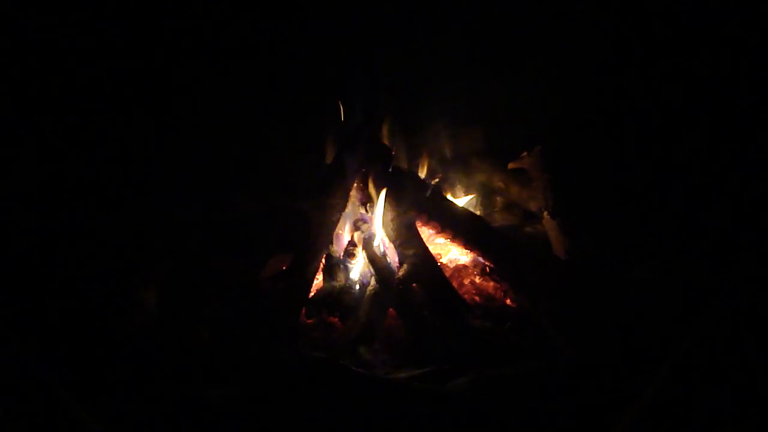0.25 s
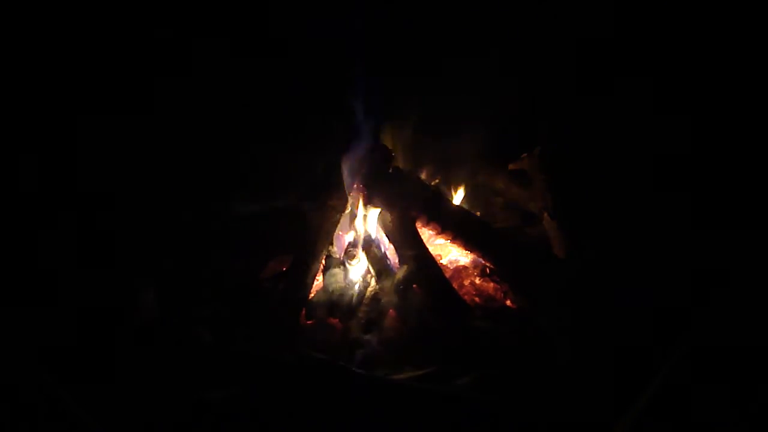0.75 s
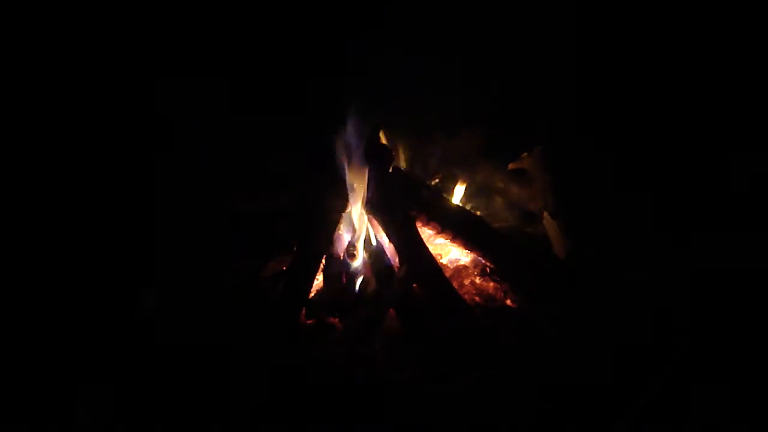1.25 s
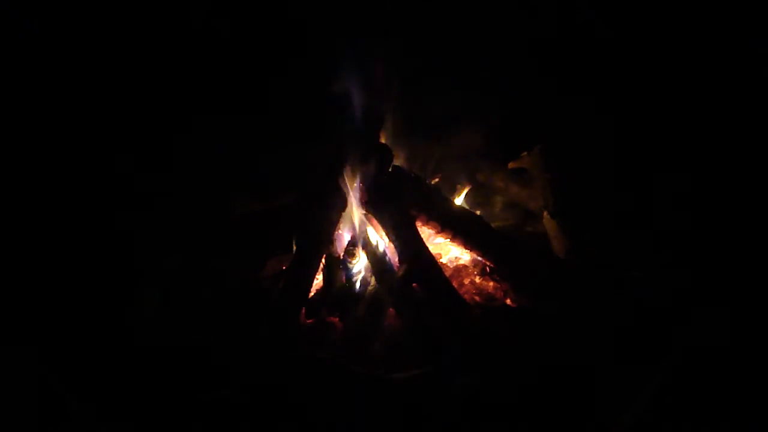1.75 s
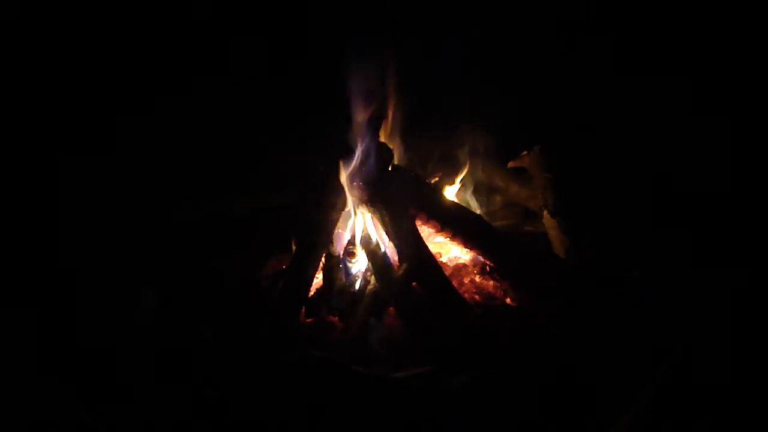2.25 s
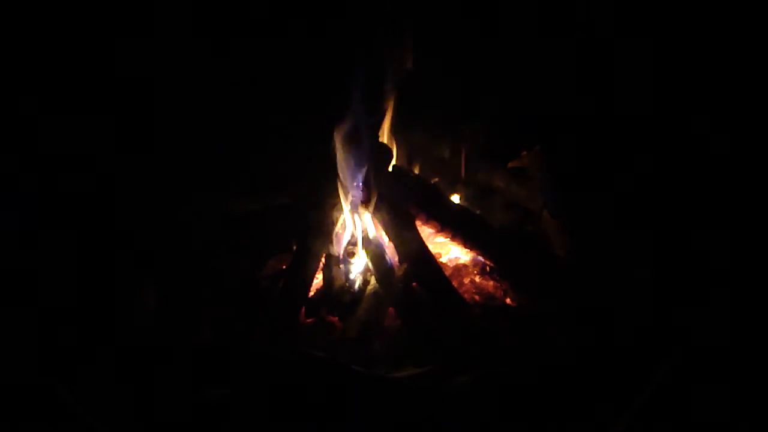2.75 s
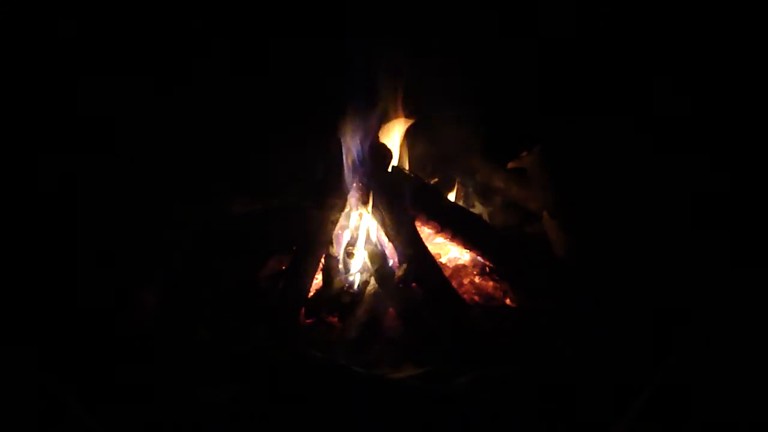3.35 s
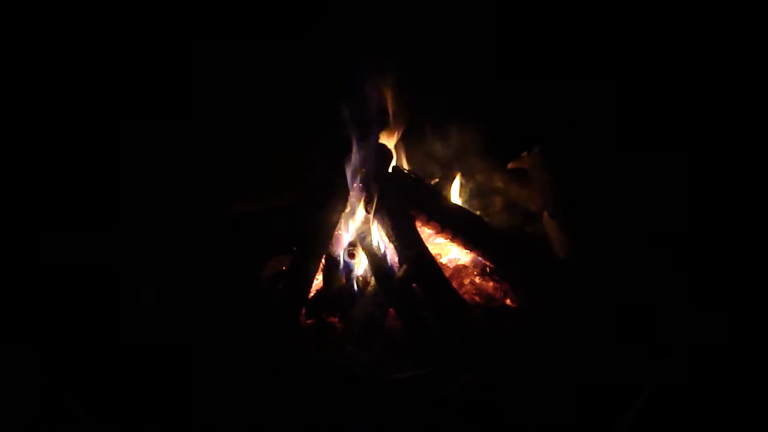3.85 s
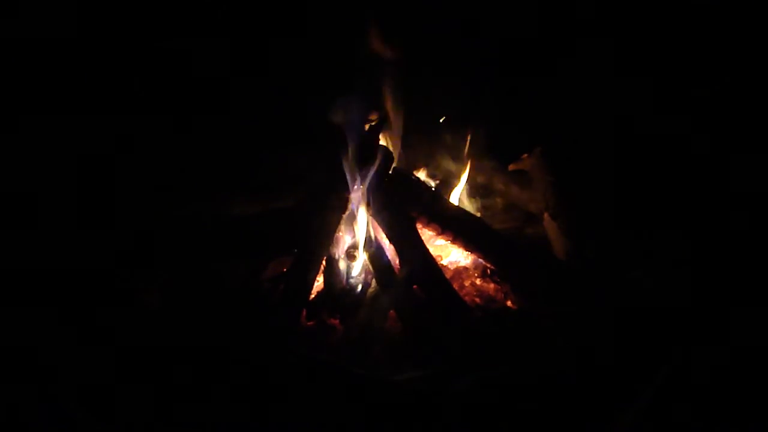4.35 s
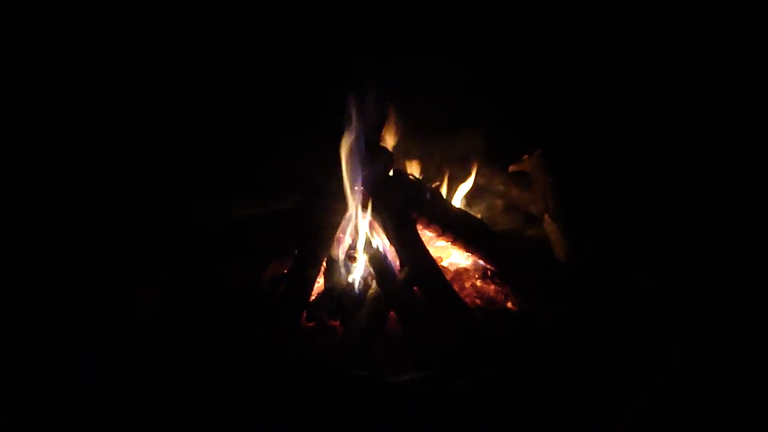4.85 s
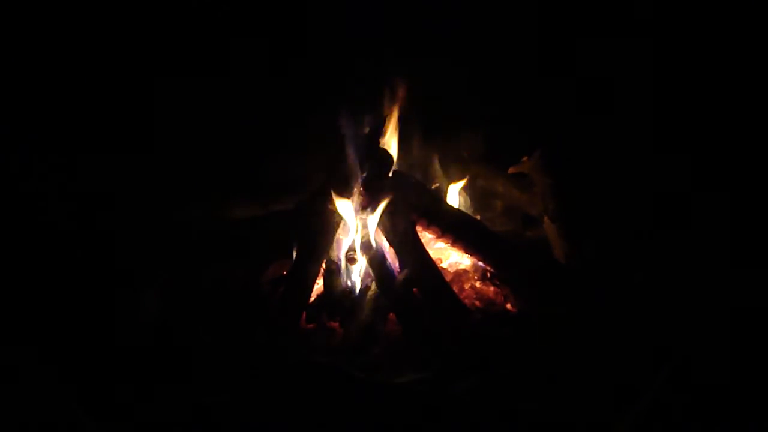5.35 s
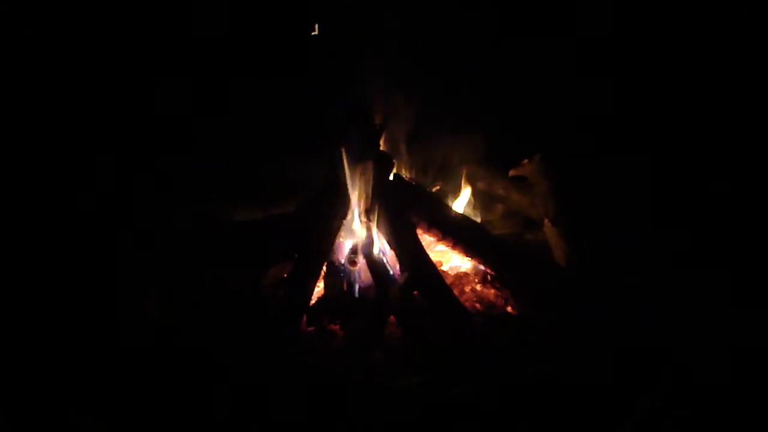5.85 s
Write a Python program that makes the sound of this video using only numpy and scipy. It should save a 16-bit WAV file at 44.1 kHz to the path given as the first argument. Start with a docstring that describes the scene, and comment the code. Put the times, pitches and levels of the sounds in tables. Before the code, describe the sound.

A small campfire burns close to the microphone, outdoors at night. Dry cracks and hollow, woody pops come at uneven moments, loudest in the first half, then lighter snaps follow, with one more strong pop near the end. Tiny ticks fill the gaps. Underneath are a soft, steady rush of flames, a thin sizzle and a faint drone like distant traffic.

```python
"""Outdoors at night, close to a small campfire.
Gas pockets in the logs burst as dry cracks and hollow knocks; each bounces off the wood and the ground,
and the surroundings answer faintly. Under them sit the soft rush of the flames, a thin sizzle of steam,
tiny ticks, a few low thuds and a far drone like road traffic."""
import sys
import numpy as np
from scipy.fft import rfft, irfft, next_fast_len
from scipy.io import wavfile
from scipy.ndimage import map_coordinates

SR = 44100
rng = np.random.default_rng(int(sys.argv[2]) if len(sys.argv) > 2 else 0)


def to_wav(s):
    """Save 16-bit WAV."""
    ch = np.atleast_2d(s).T  # columns
    pcm = np.round(np.clip(ch, -1, 1) * 32767)  # PCM
    wavfile.write(sys.argv[1], SR, pcm.astype(np.int16))


N = 268524

# Tone of the flames' rush in the night air: frequency_hz, gain_db
RUSH_EQ = [(15, -63), (25, -37), (81, -22), (145, -11.5), (280, -7.5), (335, -4), (490, -9), (999, -8.5),
           (1460, -14), (2250, -18), (2430, -17.5), (2830, -17.5), (5490, -24.5), (10100, -26),
           (10900, -27.5), (14200, -139), (22000, -120)]
# The four bands of a burst (thump, body, crack, snap): low_hz, high_hz
BURST_BANDS = [(150, 800), (800, 2000), (2000, 5500), (5500, 11000)]
# Tone of the hollow between the stacked logs: frequency_hz, gain_db
HOLLOW_EQ = [(30, -24), (130, -5.5), (290, 2), (420, -3.5), (660, 5.5), (950, 9), (1550, 8), (1880, 0),
             (2350, 0.5), (3050, 1), (3700, -5.5), (4500, 2), (5900, -5), (7400, 1.5), (8700, -1.5),
             (10300, 0)]
# Tone of the surroundings' answer: frequency_hz, gain_db
ECHO_EQ = [(100, -25), (700, -7), (1500, -4.5), (3000, -3.5), (6500, 5), (11000, -2)]
# Dry cracks: start_s, level_db, brightness_db_per_octave, pitch_hz, ground_delay_s
CRACK_CUES = [(0.175, 4, -1, 1150, 0.00091), (0.976, -7, 2, 800, 0.00072),
              (1.196, 2.5, -0.7, 4630, 0.00084), (2.1356, 1, 5, 4900, 0.0011),
              (2.1706, -17.5, -4, 5200, 0.00113), (2.2897, -18, -3.5, 2550, 0.00083),
              (2.488, -26, 4, 5500, 0.00081), (2.5954, -15.5, 1.5, 2780, 0.00118),
              (3.6125, -11, 4.5, 3220, 0.0011), (3.9053, -15, -3, 1300, 0.001),
              (3.9296, -7.1, 1, 1520, 0.00104), (4.0832, -12.7, 3, 3500, 0.0012),
              (4.3568, -5, 0.1, 1400, 0.00129), (4.615, -18, 3, 2700, 0.0011),
              (5.1342, -9.5, -0.1, 1100, 0.00073), (5.2253, -11.5, -0.2, 3270, 0.00072),
              (5.5851, -7.5, 1.5, 3400, 0.0014), (6.0635, -13, -3.5, 850, 0.0011)]
# Soft low thuds: peak_s, level_db
THUD_CUES = [(0.628, -41), (0.654, -45), (0.6864, -41), (2.137, -41), (2.172, -36)]
# Hollow knocks: start_s, level_db, brightness_db_per_octave, pitch_hz
KNOCK_CUES = [(0.6288, 11.5, 2, 2000), (0.7328, 4, 0.7, 2170), (2.7794, 10, -1, 2780),
              (3.005, -11.5, -6.5, 655), (5.6961, 7.5, -0.5, 1650)]

BAND_CENTRES_HZ = np.sqrt(np.prod(BURST_BANDS, axis=1))


def amp(db):
    return 10 ** (np.asarray(db) / 20)


def unit_rms(x):
    return x / np.sqrt(np.mean(x ** 2) + 1e-20)


def eq_db(points, hz):
    """An EQ curve through (frequency_hz, gain_db) points on a log frequency axis."""
    points_hz, gains_db = np.transpose(points)
    return np.interp(np.log(hz + 1), np.log(points_hz + 1), gains_db)


def wobble(rate_hz):
    """A smooth random drift."""
    knots = rng.standard_normal(int(N * rate_hz / SR) + 4)
    return map_coordinates(knots, [np.arange(N) * rate_hz / SR])


def filtered(x, response):
    """Shape a sound with a gain that depends on frequency."""
    size = next_fast_len(len(x) + SR // 10)
    return irfft(rfft(x, size) * response(np.fft.rfftfreq(size, 1 / SR)), size)[:len(x)]


def causal(gain):
    """The minimum-phase response with this gain: nothing sounds before the hit."""
    cepstrum = irfft(np.log(np.maximum(gain, 1e-6)))
    half = len(cepstrum) // 2
    cepstrum[1:half] *= 2
    cepstrum[half + 1:] = 0
    return np.exp(rfft(cepstrum))


def noise_band(centre_hz, width_hz):
    """Noise of rms 1 in one narrow resonance."""
    noise = rng.standard_normal(N)
    return unit_rms(filtered(noise, lambda hz: 1 / (1 + ((hz - centre_hz) / width_hz) ** 2)))


def add(track, start_s, sound):
    start = int(np.clip(round(start_s * SR), 0, N - 1))
    track[start:start + len(sound)] += sound[:N - start]


def flames(level_db=-52.5, flutter_db=0.66):
    """The bed: an even rush of fire in the night air, fluttering slightly."""
    rush = unit_rms(filtered(rng.standard_normal(N), lambda hz: amp(eq_db(RUSH_EQ, hz))))
    return rush * amp(level_db + flutter_db * wobble(rate_hz=9))


def sizzle(pitch_hz=2440, width_hz=80, level_db=-67, waver_db=1.8):
    """Steam leaves the wood in a thin, wavering hiss."""
    return noise_band(pitch_hz, width_hz) * amp(level_db + waver_db * wobble(rate_hz=4.45))


def drone(pitch_hz=338, width_hz=34, level_db=-58, waver_db=0.8, full_s=3.74, rise_db_per_s=5):
    """A far drone, like tyres on a road, swells and then holds, wavering."""
    swell_db = rise_db_per_s * np.minimum(np.arange(N) / SR - full_s, 0)
    return noise_band(pitch_hz, width_hz) * amp(level_db + swell_db + waver_db * wobble(rate_hz=4.69))


def burst(ground_delay_s, pitch_hz, levels_db, ground_gain=0.55, splinter_db=5, splinter_octaves=0.19,
          scatter_gain=1.03, scatter_hz=6000, ring_gain=0.32, size=2048):
    """One pressure spike rings a splinter, scatters inside the stack and bounces off the ground."""
    t, hz = np.arange(size) / SR, np.fft.rfftfreq(size, 1 / SR)

    def noise_tail(t60_s):
        return rfft(unit_rms(rng.standard_normal(size) * amp(-60 * t / t60_s))) / np.sqrt(size)

    # only short waves scatter off the sticks
    spike = scatter_gain * hz / (hz + scatter_hz) * noise_tail(t60_s=0.0024) - 1
    # the ground bounce combs the spectrum into a hollow, woody knock
    comb = 1 - ground_gain * np.exp(-2j * np.pi * hz * ground_delay_s)
    ring = ring_gain * noise_tail(t60_s=0.026)
    peak_db = splinter_db / (1 + (np.log2((hz + 1) / pitch_hz) / splinter_octaves) ** 2)
    spectrum = (spike * comb + ring) * causal(amp(eq_db(HOLLOW_EQ, hz) + peak_db))
    # ride each band towards its level: big pockets thump, fine splinters snap
    band_power = [np.mean(abs(spectrum[(hz > low) & (hz < high)]) ** 2) for low, high in BURST_BANDS]
    colour = list(zip(BAND_CENTRES_HZ, levels_db - 10 * np.log10(band_power)))
    return irfft(spectrum * causal(amp(eq_db(colour, hz))))


def ticks(count=45, level_db=-31, spread_db=5, max_db_per_band=5, ground_delay_s=0.00092, pitch_hz=3000):
    """Tiny bursts, some crisp and some dull, at random moments, barely above the flames."""
    track = np.zeros(N)
    for when, strength, dullness, size in rng.uniform(size=(count, 4)):
        rolloff_db = max_db_per_band * dullness * np.arange(len(BURST_BANDS))
        levels_db = level_db + spread_db * strength ** 2 - rolloff_db
        add(track, when * N / SR, burst(ground_delay_s, pitch_hz * 2 ** (0.5 - size), levels_db))
    return track


def surroundings(levels_db, t60_s=0.11, rise_s=0.023, slap_s=0.0245, slap_db=-7):
    """The surroundings return a burst as one small slap in a short, bright spray."""
    t = np.arange(SR // 4) / SR
    swell = 1 / (1 + np.exp(np.clip((rise_s - t) / 0.0065, -50, 50)))
    spray = unit_rms(rng.standard_normal(len(t)) * swell * amp(-60 * t / t60_s)) / np.sqrt(len(t))
    spray[round(slap_s * SR)] += amp(slap_db)
    colour = list(zip(BAND_CENTRES_HZ, levels_db))
    return filtered(spray, lambda hz: amp(eq_db(colour, hz) + eq_db(ECHO_EQ, hz)))


def pop(start_s, level_db, brightness, pitch_hz, ground_delay_s, colour_db, echo_db, pivot_hz=2000):
    """A foreground burst and its echo: one colour_db per band, tilted by brightness in dB per octave."""
    track = np.zeros(N)
    tilt_db = brightness * np.log2(BAND_CENTRES_HZ / pivot_hz)
    levels_db = level_db + np.array(colour_db) + tilt_db
    send_db = echo_db - 2 * brightness  # bright bursts return less echo
    add(track, start_s, burst(ground_delay_s, pitch_hz, levels_db))
    add(track, start_s, amp(send_db) * surroundings(levels_db))
    return track


def cracks(colour_db=(2.5, -3.5, -1.5, -12.5), echo_db=-15):
    """Dry pops all over the logs, each with its own path to the ground."""
    return sum(pop(*cue, colour_db, echo_db) for cue in CRACK_CUES)


def thuds(width_s=0.0005):
    """Single low pushes of air with no ring."""
    t = np.arange(N) / SR
    return -sum(amp(db) * np.exp(-0.5 * ((t - peak_s) / width_s) ** 2) for peak_s, db in THUD_CUES)


def knocks(ground_delay_s=0.001045, colour_db=(-6.5, 0, -4, -16.5), echo_db=-17.5):
    """Hollow pops from one spot deep in the stack, all sharing one path to the ground."""
    return sum(pop(*cue, ground_delay_s, colour_db, echo_db) for cue in KNOCK_CUES)


def scene():
    """The mono mix: pops up front, ticks and thuds behind, over a bed of steam, flames and drone."""
    return (knocks() + cracks() + ticks() + thuds() + sizzle() + flames() + drone())[None]


def record(dry, cutoff_hz=11060):
    """A brick-wall low-pass takes off the top end."""
    return np.array([filtered(channel, lambda hz: 1 / np.sqrt(1 + (hz / cutoff_hz) ** 300))
                     for channel in dry])


dry = scene()
out = record(dry)
to_wav(out)
```